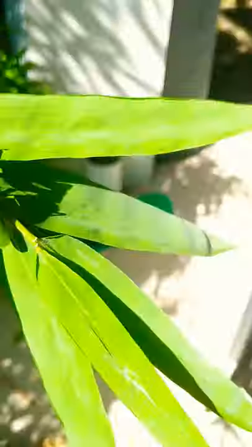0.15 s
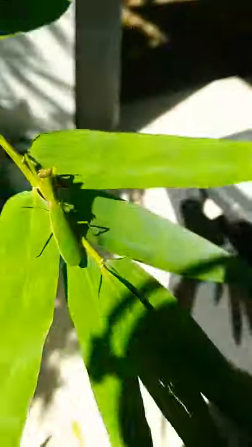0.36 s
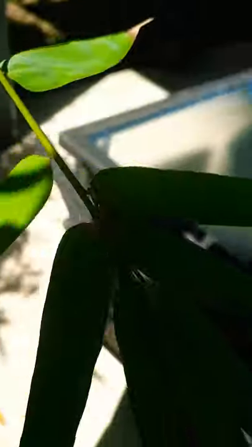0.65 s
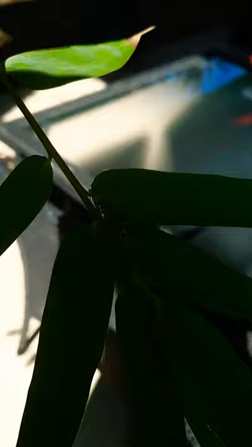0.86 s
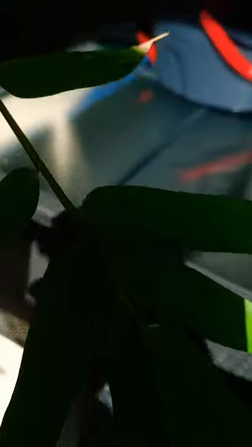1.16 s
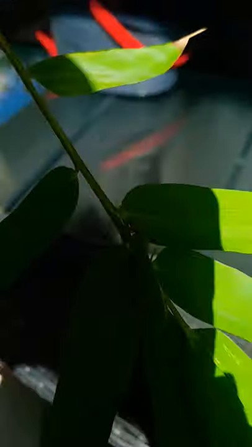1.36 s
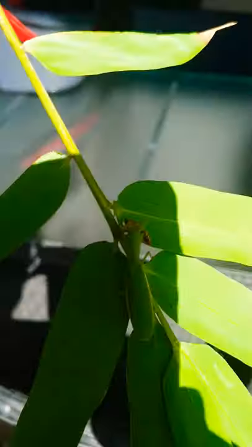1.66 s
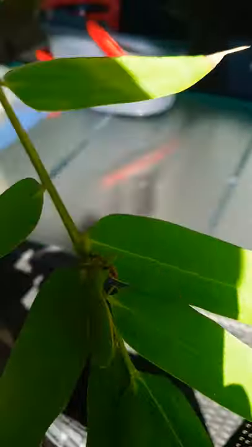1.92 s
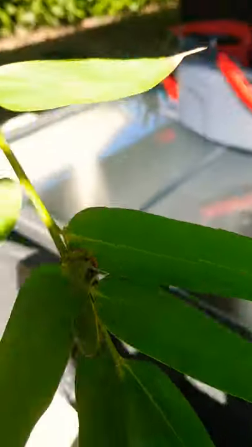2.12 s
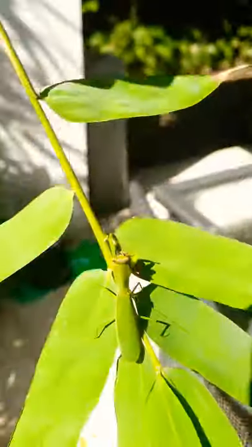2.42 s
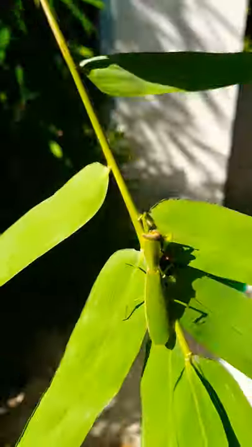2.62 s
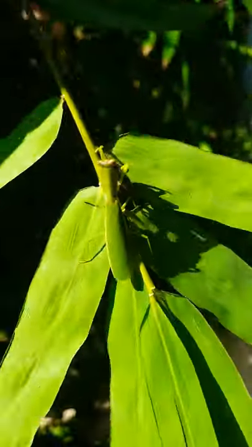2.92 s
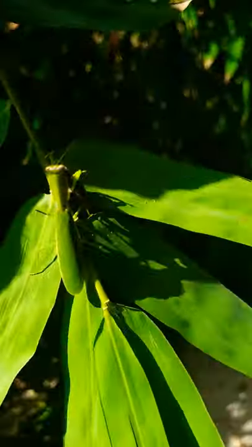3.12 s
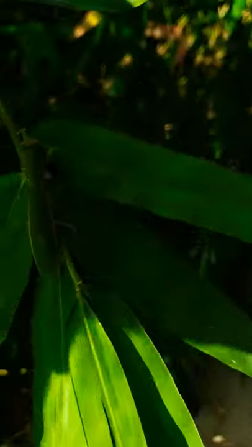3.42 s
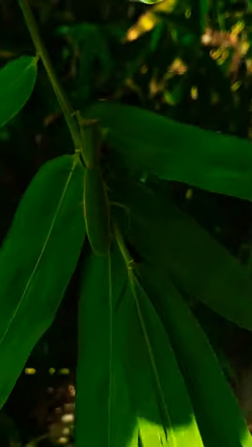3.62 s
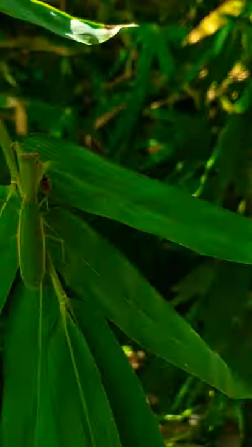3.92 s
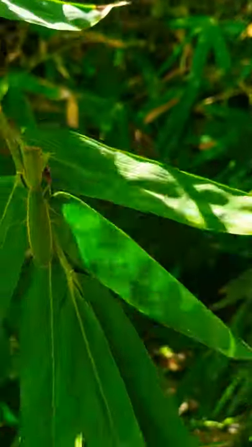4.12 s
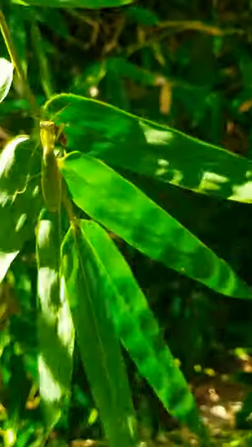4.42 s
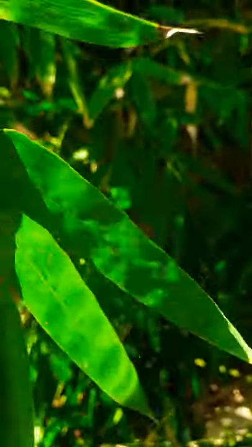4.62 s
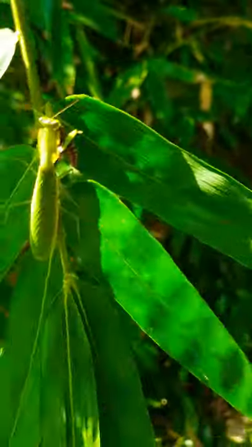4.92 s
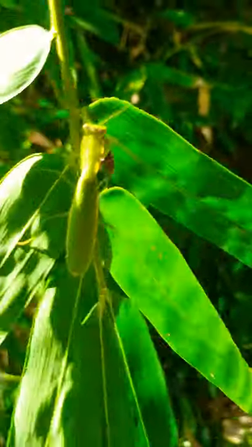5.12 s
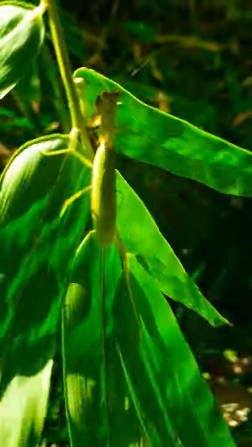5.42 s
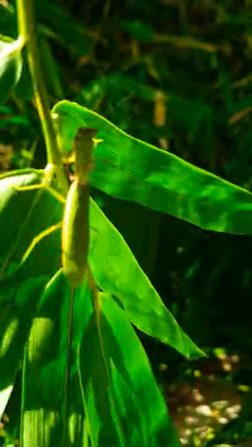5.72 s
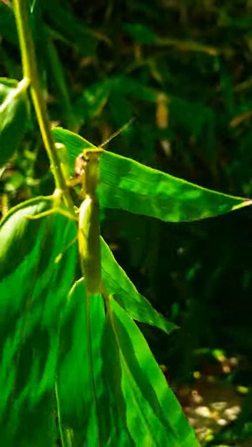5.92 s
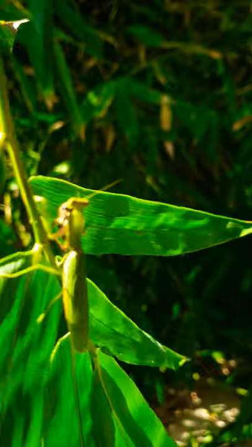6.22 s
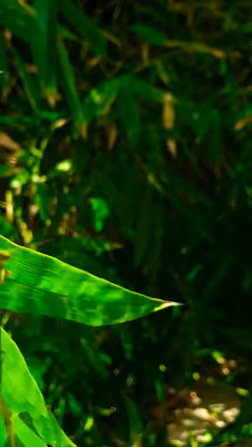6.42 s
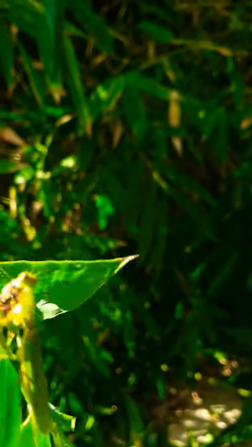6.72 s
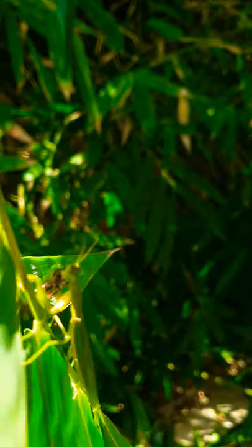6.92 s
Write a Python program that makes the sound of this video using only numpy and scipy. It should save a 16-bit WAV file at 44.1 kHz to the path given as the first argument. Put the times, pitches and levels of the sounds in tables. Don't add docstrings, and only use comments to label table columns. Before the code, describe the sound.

Very close, dry papery leaves rustle in gusts, hissing and crackling, louder on the right. A cluster of snaps and soft thuds comes just after one second, a hard sharp crack near four, then another strong gust. The rustle dies away to sparse ticks and a light tap. Low wind throbs on the handheld microphone; a far engine and machine hum lie faintly underneath outdoors.

```python
import sys
import numpy as np
from scipy import signal
from scipy.fft import rfft, irfft, next_fast_len
from scipy.io import wavfile
from scipy.ndimage import uniform_filter1d

SR = 44100
rng = np.random.default_rng(int(sys.argv[2]) if len(sys.argv) > 2 else 0)


def voltage_ratio(level):
    return 10 ** (np.asarray(level, float) / 20)


def materialize(psi):
    bounded = np.clip(np.atleast_2d(psi).T, -1, 1)
    quanta = np.round(bounded * 32767).astype(np.int16)
    wavfile.write(sys.argv[1], SR, quanta)


N = 311257
T = np.arange(N) / SR
SIZE = next_fast_len(N)
HZ = np.maximum(np.arange(SIZE // 2 + 1) * SR / SIZE, 1)

# (frequency [Hz], gain [dB])
RIGHT_PORT = [(160, -11), (900, -7), (1600, -7.5), (2500, -7.5), (3500, -3), (4400, -8.5), (5200, -5.5),
              (6200, -8.5), (7300, -4.5), (9500, -4), (11000, -13.5), (12200, -5.5), (14200, -11.5),
              (15700, -15)]
LEFT_PORT = [(160, -4.5), (700, -1), (1700, -0.5), (3300, -2), (5700, 3), (6600, -4.5), (7800, -14),
             (9300, -9.5), (11400, -11), (12500, -10), (15600, -9)]


def level(x, db):
    return x * voltage_ratio(db) / np.sqrt(np.mean(x ** 2))


def curves(table):
    s, *columns = np.transpose(table)
    return [np.interp(T, s, c) for c in columns]


def colour(x, hz, db):
    grid = np.maximum(np.arange(2049) * SR / 4096, 1)
    log_gain = np.log(voltage_ratio(np.interp(np.log(grid), np.log(hz), db)))
    cepstrum = irfft(log_gain)
    cepstrum[1:2048] *= 2
    cepstrum[2049:] = 0
    response = irfft(np.exp(rfft(cepstrum)))
    return signal.fftconvolve(x, response)[:N]


def band(spectrum, hz, octaves):
    bell = np.exp(-.5 * (np.log2(HZ / hz) / octaves) ** 2)
    return irfft(spectrum * bell, SIZE)[:N]


def walk(rate):
    hold = int(SR / rate)
    steps = np.repeat(rng.standard_normal(2000), hold)[:N + hold]
    slewed = uniform_filter1d(uniform_filter1d(steps, hold), hold)[:N]
    return slewed / slewed.std()


def late(x):
    lag = 22
    return np.concatenate([np.zeros(lag), x[:-lag]])


def add(out, s, burst):
    i = int(s * SR)
    out[..., i:i + burst.shape[-1]] += burst[..., :N - i]


def swells(rows, floor_db, *edges_s):
    t, power = T[::32], 0
    for row in rows:
        start, end, db, rise_s, fall_s = (*row, *edges_s)
        outside = np.maximum((start - t) / rise_s, (t - end) / fall_s)
        power = power + voltage_ratio(2 * (db - 20 * np.maximum(0, outside)))
    return 10 * np.log10(np.interp(T, t, power) + voltage_ratio(2 * floor_db))


def contacts(per_s, spread_db, ring_s):
    strength_db = spread_db * np.minimum(rng.exponential(size=N), 3)
    hits = (rng.random(N) < per_s / SR) * voltage_ratio(2 * strength_db)
    power = signal.lfilter([1], [1, -np.exp(-1 / (ring_s * SR))], hits)
    return power / power.mean()


def rustle():
    # (full from [s], full until [s], level [dB], rise [s], fall [s])
    gusts = [(0, .055, -43.5, .1, 0.097), (.17, .19, -41.5, 0.11, 0.18), (.25, .385, -36, 0.43, 0.14),
             (.64, .65, -48.5, 0.19, .3), (1.0, 1.27, -42.5, 0.32, 0.094),
             (1.19, 1.27, -43.5, 0.036, 0.094), (1.6, 1.84, -37.5, .16, .14), (1.78, 1.84, -40.5, 0.3, .14),
             (2.08, 2.1, -48.5, 0.038, 0.57), (2.33, 2.42, -38, 0.71, 0.53), (2.4, 2.56, -41, 0.62, 0.36),
             (2.99, 3.0, -51.5, 0.15, 0.37), (3.25, 3.3, -56, .4, .1), (3.56, 3.57, -51.5, .3, .36),
             (3.9, 4.13, -45, 0.21, .12), (4.12, 4.14, -43, 0.075, 0.087), (4.2, 4.3, -53, 0.16, 0.4),
             (4.47, 4.83, -38, 0.14, 0.31), (4.6, 4.85, -40.5, 0.33, 0.28), (5.33, 5.5, -52, 0.29, 0.22),
             (5.65, 5.66, -49.5, 0.15, 0.14), (5.94, 5.96, -55.5, 0.45, .5), (6.3, 6.39, -70, .3, .05),
             (6.6, 6.61, -66, 0.11, 0.4)]
    # (time [s], level [dB])
    breeze = [(0, -52.5), (.9, -50), (1.32, -60), (2.7, -57.5), (3.25, -56), (3.38, -60.5), (5.1, -62),
              (5.85, -59.5), (6.2, -68.5), (6.42, -73), (7.06, -74)]
    gust_db = swells(gusts, curves(breeze)[0])
    weak = np.clip(gust_db + 38, -16, 0)
    rising = np.tanh(uniform_filter1d(np.gradient(gust_db) * SR, size=4000) / 89)
    dull_db = -3.5 - 0.27 * weak
    bright_db = 1 + 0.1141 * weak
    top_db = 1 + 0.17 * weak + 0.5 * rising

    grit = 0.8 + 0.28 * contacts(per_s=540, spread_db=-2.0, ring_s=0.0015)
    crackle = contacts(per_s=25, spread_db=4.5, ring_s=0.0094)
    near, far = (rfft(np.sqrt(grit) * rng.standard_normal(N), SIZE) for _ in range(2))
    lull = np.clip((-37 - gust_db) / 14, .2, 1.2)
    left, right, shiver = 0, 0, walk(30)
    for hz in 157 * 2 ** np.arange(0, 7.4, 2 / 3):
        high = np.clip(np.log2(hz / 1000) / 8.0, .05, 1)
        tilt_db = np.clip(np.log2(1600 / hz), 0, 1) * dull_db
        tilt_db = tilt_db + (6000 < hz < 11000) * bright_db + (hz > 11000) * top_db
        flicker_db = 1.8 * high * shiver + (0.7 + 0.7 * (hz < 1300)) * walk(12)
        gain = voltage_ratio(tilt_db + flicker_db) * np.sqrt(1 + 0.29 * lull * high * crackle)
        alike = np.clip(.72 - 0.29 * np.log2(hz / 700), 0, .85) * (hz < 4000)
        direct = gain * band(near, hz, 0.48)
        right = right + direct
        left = left + alike * late(direct) + np.sqrt(1 - alike ** 2) * gain * band(far, hz, 0.23)
    left = level(colour(left, *np.transpose(LEFT_PORT)), -4)
    right = level(colour(right, *np.transpose(RIGHT_PORT)), 10.11)
    return voltage_ratio(gust_db) * np.array([left, right + hollows()])


def hollows():
    # (start [s], end [s], centre [Hz], width [Hz], level relative to the gust level [dB])
    whistles = [
        (0.923, 1.192, 8600, 2500, -1),
        (1.824, 1.893, 410, 40, -4),
        (2.048, 2.126, 1993, 717, 2.5),
        (2.104, 2.658, 8600, 2500, -2),
        (4, 4.11, 5750, 1113, 10),
        (4.003, 4.097, 7540, 900, 5),
        (4.375, 5.013, 1630, 497, -2),
        (4.397, 4.957, 3600, 700, -5.5),
        (4.401, 4.95, 5300, 596, -14),
        (4.396, 4.94, 7400, 1000, -0.5),
    ]
    out = np.zeros(N)
    for start, end, hz, width_hz, db in whistles:
        t = T[:int((end - start) * SR)]
        breath = signal.lfilter(*signal.iirpeak(hz, hz / width_hz, SR), rng.standard_normal(len(t)))
        edge_s = min(.04, t[-1] / 3)
        add(out, start, level(breath, db) * np.clip(np.minimum(t, t[-1] - t) / edge_s, 0, 1))
    return out


def leaf_at_ports(out):
    bright = signal.sosfilt(signal.butter(2, 1200, "high", fs=SR, output="sos"), out)
    left = voltage_ratio(-22) * late(colour(bright, *np.transpose(LEFT_PORT)))
    return np.array([left, colour(bright, *np.transpose(RIGHT_PORT))])


def ticks():
    # (time [s], peak [dB], pitch [Hz], ring [s])
    edge_snaps = [(1.187, -20, 9140, 0.014), (1.2697, -24, 8860, 0.011), (1.2834, -22, 5420, 0.009),
                  (1.4621, -50, 12200, 0.012), (2.768, -20.5, 12400, 0.012), (2.9924, -32.5, 9300, 0.0089),
                  (3.1188, -39, 10200, 0.014), (3.1383, -32, 9510, 0.012), (3.221, -38, 7820, 0.012),
                  (3.29, -38, 9080, 0.012), (3.4474, -42, 7500, 0.009), (3.864, -30, 3480, 0.012),
                  (4.1954, -48, 3654, 0.012), (4.3166, -31, 9790, 0.02), (5.206, -31, 9400, 0.011),
                  (5.6596, -41, 7770, 0.012), (5.93, -36, 7410, 0.011), (6.0506, -37, 8300, 0.012),
                  (6.236, -42, 6500, 0.013), (6.5251, -50, 9990, 0.015), (6.6159, -50, 8320, 0.013),
                  (6.6876, -46, 9510, 0.011),
                  (3.9305, -18, 10000, 0.004),
        (3.9316, -12.5, 12800, 0.022),
        (3.9322, -25, 8500, 0.0088),
        (3.8645, -30, 9200, 0.015),
    ]
    out, t = np.zeros(N), T[:4000]
    for s, db, hz, ring_s in edge_snaps:
        noise = rng.standard_normal((2, len(t)))
        leaf = signal.iirpeak(hz, 2.1, SR)
        ring = signal.lfilter(*leaf, signal.lfilter(*leaf, noise[0]))
        decay = np.exp(-np.log(1000) * t / max(ring_s, .001))
        burst = (ring / ring.std() + 0.27 * noise[1]) * (decay + .07 * decay ** 0.23)
        burst[:2] = 2, -2
        add(out, s, voltage_ratio(db + 11.5) * burst / np.abs(burst).max())
    return leaf_at_ports(out)


def brushes():
    # (middle [s], length [s], level [dB], centre [Hz])
    passes = [(1.199, .03, -25.5, 3000), (3.003, 0.038, -37, 4000), (3.234, 0.039, -38, 5940),
              (3.298, 0.028, -38.5, 7020), (3.459, 0.052, -45, 9000), (3.868, .014, -36, 5000),
              (4.33, 0.045, -37, 10080), (5.215, 0.023, -34, 8000), (5.51, 0.036, -52, 9930),
              (5.661, 0.051, -46, 6060), (5.895, 0.033, -42, 7970), (5.94, 0.021, -36, 7000),
              (6.058, 0.04, -44, 8930), (6.245, 0.051, -46.5, 9120), (6.635, 0.045, -50, 8870)]
    out, t = np.zeros(N), T[:4000]
    for s, length, db, hz in passes:
        scrape = signal.lfilter(*signal.iirpeak(hz, .8, SR), rng.standard_normal(len(t)))
        swell = np.sin(np.pi * np.minimum(t / length, 1) ** 0.8) ** 2
        add(out, s - length / 2, voltage_ratio(db + 6.5) * scrape * swell)
    return leaf_at_ports(out)


def knocks():
    # (time [s], peak [dB], pitch [Hz], ring [s], left minus right [dB])
    thuds = [(.09, -43, 290, 0.037, -7), (1.1875, -33.5, 835, 0.019, -7), (1.186, -36.5, 240, 0.066, -6),
             (1.193, -40.5, 290, 0.04, -2), (1.217, -42, 620, .04, -6), (1.283, -36.5, 330, 0.015, -1),
             (1.292, -44, 200, 0.039, -2), (2.992, -42.5, 960, 0.012, -12), (4.1041, -39, 292, 0.07, -5),
             (4.104, -42.5, 185, 0.099, -6), (4.137, -46, 222, 0.026, -2), (4.149, -50, 292, 0.04, -6)]
    out, t = np.zeros((2, N)), T[:6000]
    for s, db, hz, ring_s, pan_db in thuds:
        decay = np.exp(-np.log(1000) * t / max(ring_s, .005))
        overtone = 0.91 * np.sin(2 * np.pi * 2.6 * hz * t) * np.exp(-t / 0.0018)
        thud = np.sin(2 * np.pi * hz * t) + overtone
        rattle = signal.lfilter(*signal.iirpeak(0.82 * hz, 1.5, SR), rng.standard_normal(len(t)))
        thud = thud * decay + 0.25 * rattle / rattle.std() * decay ** 0.2
        thud = (1 - np.exp(-t / 0.00053)) * thud
        add(out, s, voltage_ratio(db + 4.5 + np.array([[pan_db], [-pan_db]]) / 2) * thud)
    return out


def taps():
    # (time [s], peak [dB])
    touches = [
        (6.712, -43),
        (6.7325, -26),
    ]
    out, t = np.zeros((2, N)), T[:6000]
    push = np.exp(-((t - .0002) / 0.000096) ** 2)
    click = 0.23 * np.sin(2 * np.pi * 5800 * t) * np.exp(-t / 0.00062)
    rebound = 0.2 * np.sin(2 * np.pi * 110 * t) * np.exp(-t / 0.0077)
    for s, db in touches:
        add(out, s, voltage_ratio(db + np.array([[0], [-18]])) * (push + click - rebound))
    return out


def buffet():
    # (full from [s], full until [s], level [dB])
    puffs = [(0, .55, -51.5), (.67, .86, -50), (.98, 1.3, -50.5), (1.39, 1.4, -43.5), (1.55, 1.6, -47),
             (1.85, 1.87, -41.5), (2.0, 2.4, -49), (2.45, 2.59, -41), (2.69, 2.75, -39.5),
             (3.01, 3.03, -43.5), (3.25, 3.33, -46.5), (3.42, 3.5, -46.5), (3.58, 3.6, -42),
             (3.75, 4.2, -49.5), (4.5, 4.52, -43), (4.8, 5.09, -43.5), (5.31, 5.43, -41), (5.64, 5.66, -44),
             (6.07, 6.36, -54), (6.72, 6.73, -57), (7.03, 7.06, -55)]
    chance = rfft(rng.standard_normal((3, N)), SIZE) / (1 + (HZ / 62) ** 3)
    both, left, right = (level(band(c, 70, 0.6), 0) for c in chance)
    own = .4 * left - .3 * right
    calm_db, rise_s, fall_s = -62, 0.12, 0.19
    puff_db = swells(puffs, calm_db, rise_s, fall_s) - 6 + 1.8 * walk(10)
    return voltage_ratio(puff_db) * (both + np.array([own, -.4 * own]))


def carried_tone(pitch, heard, faint_db):
    phase = 2 * np.pi * np.cumsum(curves(pitch)[0] + .5 * walk(3.99)) / SR
    rise_s, fall_s = 0.28, 0.26
    db = swells(heard, faint_db, rise_s, fall_s) + 1.8 * walk(5.04)
    fade = np.clip((T - pitch[0][0]) / 0.063, 0, 1)
    return fade * voltage_ratio(db) * (np.sin(phase) + voltage_ratio(-19) * np.sin(2 * phase))


def engine():
    # (time [s], pitch [Hz])
    firing_hz = [(.8, 65), (1.1, 69.46), (2.15, 66.8), (3.05, 69), (4.4, 74), (5, 76.6), (5.7, 78.05),
                 (6.3, 79.44), (7.06, 79.4)]
    # (full from [s], full until [s], level [dB])
    note_heard = [(0.998, 1.05, -46.5), (1.8, 1.935, -54), (2.203, 2.4, -46), (2.5, 2.85, -49.5),
                  (4.3, 5.05, -54), (5.63, 5.72, -49.5), (6.03, 6.356, -52.5)]
    # (time [s], pitch [Hz])
    whine_hz = [(.8, 226.4), (2.3, 224.9), (3.2, 228.4), (4.1, 241.8), (5, 250), (5.8, 254.2), (6.3, 251.5),
                (7.06, 251.4)]
    # (full from [s], full until [s], level [dB])
    whine_heard = [(1.05, 1.15, -62), (2.2, 2.754, -59.5), (3.35, 4.2, -63.5), (4.2, 5.7, -65),
                   (6.75, 7.06, -64.5)]
    pump = voltage_ratio(-64.5 + 1.0 * walk(2.85)) * np.sin(2 * np.pi * 88.5 * T)
    note = carried_tone(firing_hz, note_heard, faint_db=-66.5)
    whine = carried_tone(whine_hz, whine_heard, faint_db=-68.5)
    out = pump + note + whine
    return np.array([voltage_ratio(-0.7) * out, voltage_ratio(1.1) * out])


def town():
    # (frequency [Hz], left [dB], right [dB])
    hum = [(60, -5, 1.5), (130, -5.5, -2.5), (250, -2.5, -0.5), (368, -14, -13), (900, -21.5, -15.5),
           (3000, -57, -14), (5900, -21, -20.5), (6600, -43, -20), (7400, -38, -24), (9100, -60, -18),
           (11200, -59, -31), (12500, -48, -27), (15600, -38, -38)]
    hz, left_db, right_db = np.transpose(hum)
    both, left, right = rng.standard_normal((3, N))
    low, high = (signal.butter(1, 500, kind, fs=SR) for kind in ("low", "high"))
    both = signal.lfilter(*low, both)
    left = colour(both + signal.lfilter(*high, left), hz, left_db)
    right = colour(both + signal.lfilter(*high, right), hz, right_db)
    return level(np.array([left, right]), -58.5) * voltage_ratio(0.61 * walk(1.03))


def scene():
    leaves = rustle() + ticks() + brushes()
    handling = knocks() + taps()
    return leaves + handling + buffet() + engine() + town()


def low_pass(x):
    return signal.sosfilt(signal.butter(12, 15850, fs=SR, output="sos"), x)


def record(dry):
    left = signal.lfilter(*signal.iirnotch(7430, 9, SR), dry[0])
    ports = np.array([left, dry[1]])
    x = signal.sosfilt(signal.butter(2, 45, "high", fs=SR, output="sos"), ports)
    x = signal.sosfilt(signal.ellip(8, .2, 60, 16000, fs=SR, output="sos"), x)
    return low_pass(x)


dry = scene()
out = record(dry)
materialize(out)
```